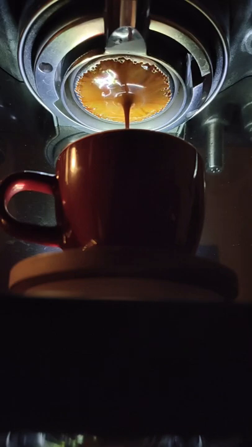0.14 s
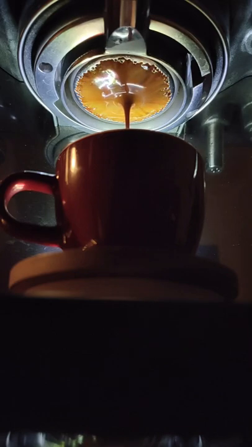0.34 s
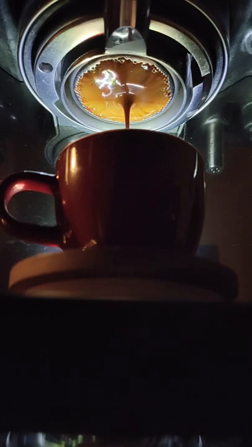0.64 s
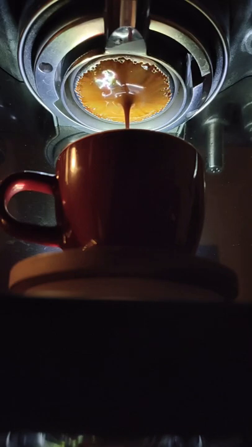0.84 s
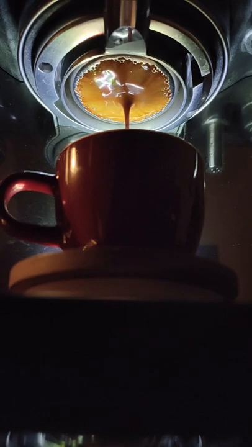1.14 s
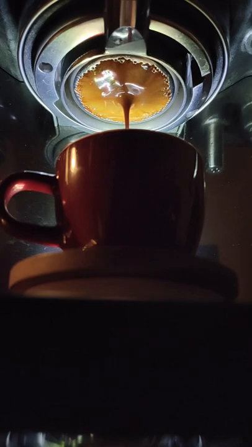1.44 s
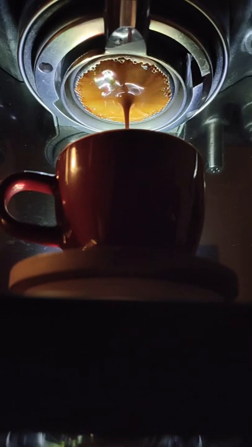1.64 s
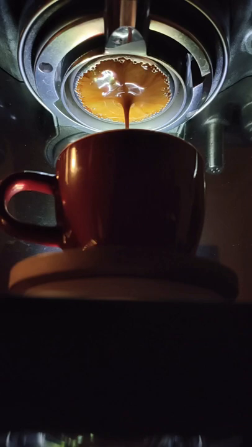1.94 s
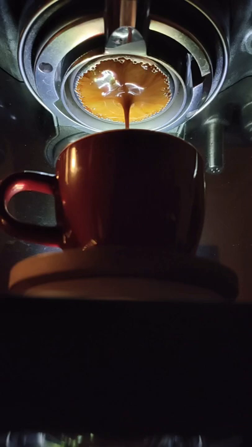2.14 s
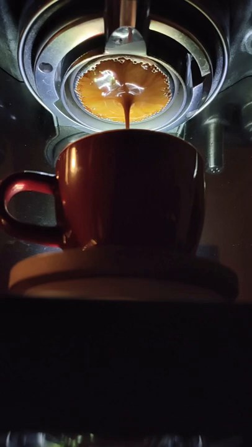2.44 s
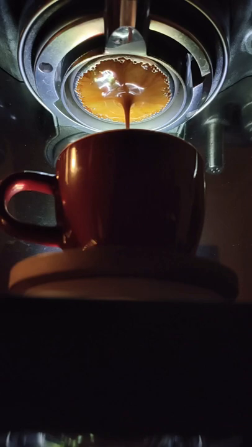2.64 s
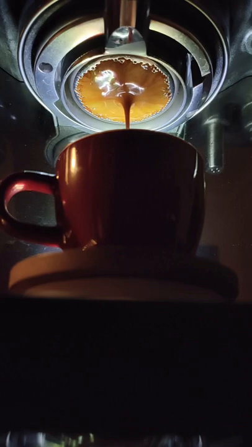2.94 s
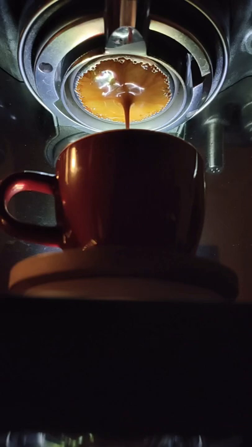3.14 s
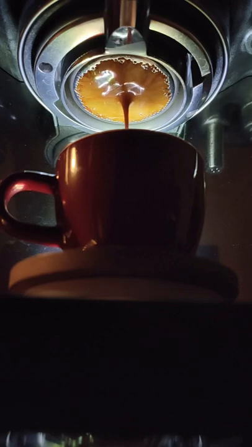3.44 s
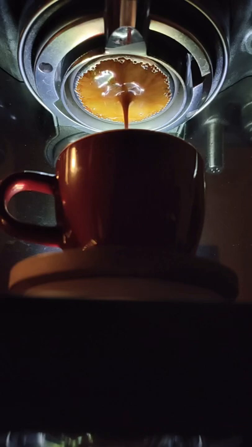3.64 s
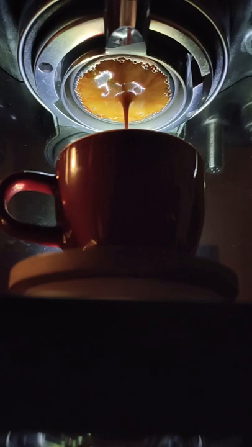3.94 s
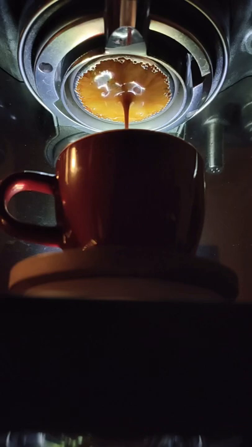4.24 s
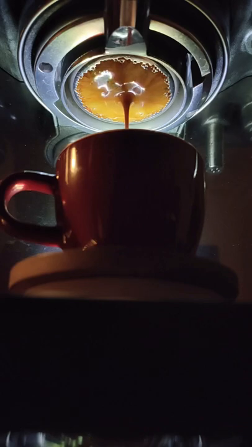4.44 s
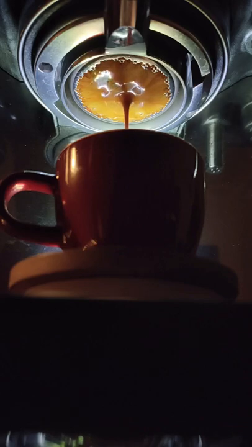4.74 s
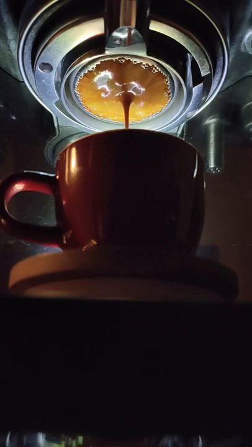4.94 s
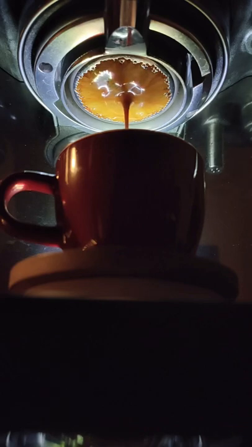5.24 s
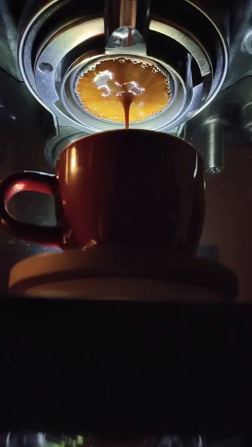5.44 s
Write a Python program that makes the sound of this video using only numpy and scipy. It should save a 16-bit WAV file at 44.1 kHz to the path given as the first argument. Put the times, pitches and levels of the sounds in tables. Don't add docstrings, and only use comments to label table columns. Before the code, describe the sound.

Close up in a kitchen, an espresso machine's vibrating pump drones without pause, a low, buzzy mains hum with fast metallic valve chatter and rattling panels. Coffee trickles softly into a cup with small plops, nearly fading around two seconds, then growing fuller toward the end. A refrigerator motor beats slowly against the hum above a low room wash. One close mono microphone, slightly dull on top.

```python
import sys
import numpy as np
from scipy import signal
from scipy.io import wavfile

SR = 44100
rng = np.random.default_rng(int(sys.argv[2]) if len(sys.argv) > 2 else 0)


def invert_db(x):
    u = np.asarray(x, float) / 20
    return 10 ** u


def store_pcm(level_fs):
    pcm = np.round(np.clip(level_fs, -1, 1) * 32767).astype(np.int16)
    wavfile.write(sys.argv[1], SR, np.atleast_2d(pcm).T)


N = 246959
T = np.arange(N) / SR
MAINS_HZ = 59.9955
CUP_HZ = 1414
# start_s, share_of_full (0-1)
BACK_PRESSURE = [
    (0, 0.17),
    (2.0, 0.04),
    (3.6, 0.42),
    (4.5, 0.98),
    (5.6, 0.91),
]


def rms_one(x):
    return x / np.sqrt(np.mean(x ** 2) + 1e-20)


def in_time(rows):
    start_s, value = np.transpose(rows)
    return np.interp(T, start_s, value)


def bumps(rows):
    return sum(db * np.exp(-.5 * ((T - s) / length) ** 2) for s, db, length in rows)


def drift(rate_hz):
    r = np.exp(-80 * np.pi * rate_hz / SR)
    noise = rng.standard_normal(N // 40 + 2002)
    slow = signal.lfilter([1], [1, -2 * r, r * r], noise)[2000:]
    return np.interp(np.arange(N) / 40, np.arange(len(slow)), rms_one(slow - slow.mean()))


def resonance(x, hz, width_hz):
    r = np.exp(-np.pi * width_hz / SR)
    poles = [1, -2 * r * np.cos(2 * np.pi * hz / SR), r * r]
    return signal.lfilter([(1 - r * r) / 2, 0, (r * r - 1) / 2], poles, x)


def body(x, modes):
    out = 0
    for k, (hz, width_hz, db) in enumerate(modes):
        out = out + (-1) ** k * invert_db(db) * resonance(x, hz, width_hz)
    return rms_one(out)


def tone(angle, rms_db):
    return np.sqrt(2) * invert_db(rms_db) * np.cos(angle)


def loose_panel_db():
    # start_s, level_db
    slips = [
        (.55, -9),
        (1.2, -4),
        (2.42, -6),
        (3.2, -9),
    ]
    slack_db, seats_s, slip_s = -7, 1.77, 0.087
    return slack_db * np.exp(-(T / seats_s) ** 2) + bumps([(s, db, slip_s) for s, db in slips])


def pump(orders, starts, unsteady_db, unsteady_rad):
    pressure = in_time(BACK_PRESSURE)
    out = 0
    for (k, db, *change_db), start in zip(orders, starts):
        k = round(k)
        level_db = db + sum(change_db) * pressure
        if k == 8:
            level_db = level_db + loose_panel_db()
        shake = np.sqrt(k / 8)
        angle = 2 * np.pi * k * MAINS_HZ * T + start + unsteady_rad * shake * drift(2.0)
        out = out + tone(angle, level_db + unsteady_db * shake * drift(1.75))
    return out


def hum():
    # mains_multiple, level_db at low pressure, change_db at full pressure
    deep = [(1, -46, .6), (2, -53, 1), (3, -44, 2), (4, -46.5, 1.7), (5, -41, -0.9), (6, -49, -2.5),
            (7, -50.5, -3.2), (8, -42, -1.5), (9, -49, -1.5), (10, -59, 8), (11, -53.5, -12), (12, -65, -5),
            (13, -68, 4.5)]
    # mains_multiple, level_db
    buzz = [(14, -68.5), (15, -73), (16, -77), (17, -74), (19, -75), (20, -72), (21, -65.5), (22, -73),
            (23, -73.5), (24, -68), (25, -71.5), (26, -72.5), (29, -78), (30, -77), (31, -76), (32, -80),
            (33, -77), (34, -78), (36, -76), (37, -73), (38, -74), (39, -76), (40, -71), (41, -72),
            (42, -75), (44, -80), (48, -84.5), (56, -82), (60, -77), (61, -84)]
    sweep = (.112, -.41, 2.95, -.42)
    low, high = np.round(deep)[:, 0], np.round(buzz)[:, 0]
    knock_s = 0.000906
    knock = -2 * np.pi * high * MAINS_HZ * knock_s + 1.64 * rng.standard_normal(len(high))
    smeared = pump(deep, np.polyval(sweep, low), unsteady_db=.7, unsteady_rad=.13)
    return smeared + pump(buzz, knock, unsteady_db=.7, unsteady_rad=.16)


def strokes(repeat, uneven_db, leak):
    # start_s into the cycle, level_db, decay_s
    contacts = [
        (.0131, -3, 0.00046),
        (.0141, -20, 0.00052),
        (.0149, -1, 0.00073),
        (.0167, 0, 0.00049),
        (.0181, -3.5, 0.00059),
    ]
    cycle = (T * MAINS_HZ).astype(int)
    strength = invert_db(uneven_db * rng.standard_normal((cycle[-1] + 2, len(contacts))))
    gate = leak
    for k, (at, db, decay_s) in enumerate(contacts):
        turns = (T - at) * MAINS_HZ + 1
        fade = np.exp(-(turns % 1) / MAINS_HZ / decay_s)
        gate = gate + invert_db(db) * strength[turns.astype(int), k] * fade
    place = np.round((T * MAINS_HZ % 1) * SR / MAINS_HZ).astype(int)
    scratch = rng.standard_normal(round(SR / MAINS_HZ) + 2)[place]
    return gate * (np.sqrt(repeat) * scratch + np.sqrt(1 - repeat) * rng.standard_normal(N))


def clatter():
    # start_s, level_db, length_s
    surges = [(.6, 0, 0.22), (.7, -3, 0.023), (.93, -3, 0.045), (1.7, 4.5, 0.019), (2.15, -3, 0.15),
              (2.75, 1, 0.12), (2.9, -2, 0.018), (3.33, -3, .04), (3.55, 2, 0.17), (3.97, 7, 0.0061),
              (4.6, -2, 0.49), (5.08, 3, 0.061), (5.3, 2, 0.075), (5.52, 2, .03)]
    # pitch_hz, width_hz, level_db
    valve_modes = [(3353, 160, 1), (3653, 95, 3), (4000, 150, -3.5), (5194, 180, -2.5), (6235, 590, -2)]
    # pitch_hz, width_hz, level_db
    seat_modes = [(7600, 320, -5.5), (8710, 500, -2), (9565, 200, 5.5), (10300, 630, -2),
                  (11800, 2000, -17.5), (13900, 500, -17)]
    level_db = -69.5 + .75 * T + bumps(surges)
    valve = invert_db(.6 * level_db - 25.0) * body(strokes(repeat=0.29, uneven_db=2.1, leak=0.34), valve_modes)
    seat = invert_db(level_db + 1.2) * body(strokes(repeat=0.11, uneven_db=4.0, leak=0.34), seat_modes)
    return valve + seat


def casing_rattle():
    # start_s, level_db, length_s
    jolts = [
        (2.05, -2.5, 0.16),
        (2.4, -2, .05),
        (2.92, 6, .015),
        (3.4, 2.5, 0.12),
        (3.51, 2.5, 0.017),
        (3.8, -1, .15),
        (4.93, 6, .015),
    ]
    # pitch_hz, width_hz, level_db
    panels = [(1890, 540, -3), (2315, 174, 7.5), (2422, 220, 7), (2675, 185, 2.5), (3010, 160, -7.5)]
    level_db = -63.5 + 0.72 * T + bumps(jolts)
    return invert_db(level_db - 1.5) * body(strokes(repeat=0.084, uneven_db=2.5, leak=0.41), panels)


def trickle(level_db):
    bursts_per_s = 2500
    sizes = invert_db(1.9 * np.minimum(rng.exponential(1, N), 5)) * rng.choice([-1, 1], N)
    born = sizes * (rng.random(N) < bursts_per_s * invert_db(1.5 * drift(8)) / SR)
    dealt = rng.integers(0, 9, N)
    out = 0
    for k, hz in enumerate(np.geomspace(1150, 1800, num=9)):
        near_db = -30 * np.abs(np.log(hz / CUP_HZ))
        ring = resonance(born * (dealt == k) + 1e-18, hz, 62.0)
        out = out + invert_db(near_db + drift(4.0)) * ring
    return invert_db(level_db - 5.0) * rms_one(out)


def gurgle(level_db):
    out = 0
    for ratio, db in [(1, -9), (1.14, -11.5), (.9, -23.0)]:
        angle = 2 * np.pi * np.cumsum(ratio * CUP_HZ + 22.0 * drift(4.87)) / SR
        out = out + np.cos(angle) * invert_db(db) * drift(23.0)
    return out * invert_db(level_db + 0.4 * (level_db + 54))


def slosh(level_db):
    murmur = resonance(resonance(rng.standard_normal(N), 656, 260), 650, 260)
    return invert_db(1.3 * (level_db + 54.0) - 64.0 + 1.3 * drift(5.4)) * rms_one(murmur)


def drops():
    # start_s, peak_db, pitch_hz
    plops = [
        (1.0494, -40, 1295),
        (1.693, -45, 2480),
        (1.9176, -43, 1410),
        (3.3754, -40, 2410),
        (3.502, -41, 1365),
        (3.6096, -39, 2430),
        (3.682, -48, 1410),
        (3.9633, -51, 1660),
        (4.9207, -48, 1526),
        (5.2646, -37, 1300),
    ]
    out = np.zeros(N)
    for s, db, hz in plops:
        age = np.clip(T - s, 0, .1)
        ring = np.sin(2 * np.pi * hz * age * (1 + 3.2 * age)) * np.exp(-age / 0.0037)
        out += invert_db(db - 6) * ring * (age < .1)
    return out


def cup():
    # start_s, level_db, length_s
    wavers = [
        (.95, 1.5, .1),
        (1.72, -1, .06),
        (2.15, 2, .08),
        (2.45, -0.5, 0.12),
        (3.92, -2, 0.027),
        (4.2, 1, 0.035),
        (5.2, 2, 0.091),
    ]
    stream_db = -58 + 8 * in_time(BACK_PRESSURE) + bumps(wavers)
    return trickle(stream_db) + gurgle(stream_db) + slosh(stream_db) + drops()


def refrigerator():
    # shaft_multiple, level_db
    rotor = [(8, -47), (11, -73), (12, -65.5), (13, -69.5), (15, -73.5)]
    # start_s, level_db
    rise = [
        (0, 2.5),
        (.4, -9),
        (.9, -3),
        (1.9, -6.5),
        (2.8, -3.5),
        (5.6, -5.5),
    ]
    # pitch_hz, level_db, wander_hz
    fan = [(40.27, -71, .1), (95.94, -73, .2), (111.2, -71, .4), (201.9, -66, 1.5), (269.1, -63, 2.5),
           (524.1, -63, .8), (555.6, -61, .5), (619.1, -74, .3)]
    shaft_hz, start_rad = 58.757, -.225
    turn = 2 * np.pi * shaft_hz * T + start_rad
    rise_db = in_time(rise)
    out = 0
    for k, db in rotor:
        out = out + tone(k * turn, db + rise_db + 0.73 * drift(4.6))
    for hz, db, wander_hz in fan:
        angle = 2 * np.pi * np.cumsum(hz + wander_hz * drift(1.5)) / SR
        out = out + tone(angle, db + 2.5 * drift(3.0))
    return out


def wash(patchy_db):
    # pitch_hz, level_db per Hz
    spectrum = [(20, -14), (45, -5), (80, -11.5), (120, -2), (190, 1), (260, -3.5), (350, -5.5), (500, 2),
                (560, -3), (620, -3.5), (760, -16.5), (1000, -19.5), (3000, -30), (14000, -44.5)]
    hz, db = np.transpose(spectrum)
    edges = 20 * 2 ** np.arange(0, 9.7, 1 / 4)
    white = rng.standard_normal((2, N + SR))
    out = 0
    for k, (low, high) in enumerate(zip(edges, edges[1:])):
        sos = signal.butter(2, [low, high], "band", fs=SR, output="sos")
        band = signal.sosfilt(sos, white[k % 2])[SR:]
        band_db = np.interp(np.log(low * high) / 2, np.log(hz), db)
        out = out + band * invert_db(band_db + patchy_db * drift(14.4))
    return invert_db(-48.5) * rms_one(out)


def thin_treble(x, jitter_db):
    # pitch_hz, limit_db from the usual level under which a slot is lost
    limits = [(10800, -14), (11800, -2), (12700, 0), (13400, -2.1), (14000, -1), (14450, -11), (14600, 7),
              (15100, -1), (15340, 14)]
    frame = dict(fs=SR, window="cosine", nperseg=2048, noverlap=1024)
    hz, _, frames = signal.stft(x, **frame)
    power = np.mean(np.abs(frames[:1020]).reshape(204, 5, -1) ** 2, axis=1)
    level_db = 10 * np.log10(power + 1e-30)
    swell_db = level_db[100:135].mean(axis=0)
    level_db -= np.median(level_db, axis=1, keepdims=True) + 0.44 * (swell_db - swell_db.mean())
    level_db += jitter_db * rng.standard_normal(level_db.shape)
    limit_db = np.interp(hz[2:1020:5], *np.transpose(limits), left=-99)
    keep = np.repeat(level_db > limit_db[:, None], 5, axis=0)
    kept = frames * np.vstack([keep, keep[-5:]])
    return signal.istft(kept, **frame)[1][:N]


def scene():
    machine = hum() + clatter() + casing_rattle()
    return (machine + cup() + refrigerator() + wash(patchy_db=1.7))[None]


def low_pass(x):
    return signal.sosfilt(signal.butter(12, 15340, fs=SR, output="sos"), x)


def record(dry):
    mix = thin_treble(dry[0], jitter_db=1.5)[None]
    return low_pass(mix)


dry = scene()
out = record(dry)
store_pcm(out)
```